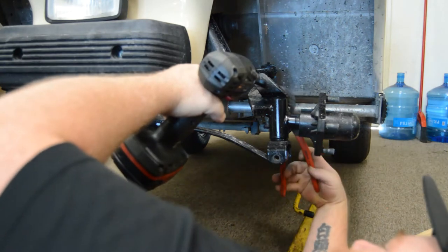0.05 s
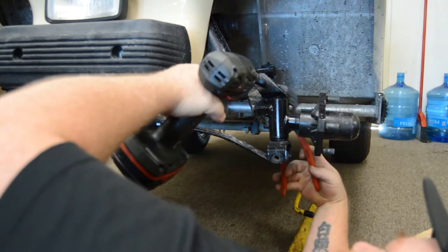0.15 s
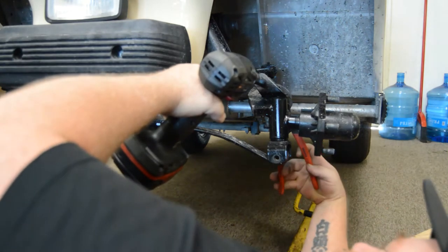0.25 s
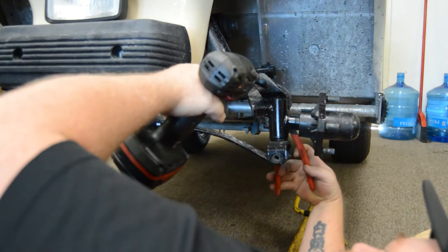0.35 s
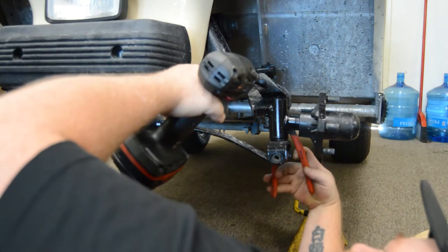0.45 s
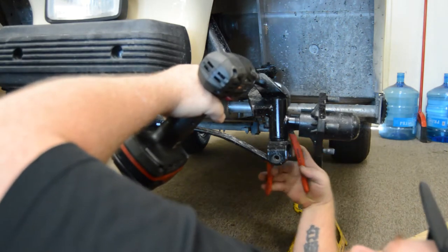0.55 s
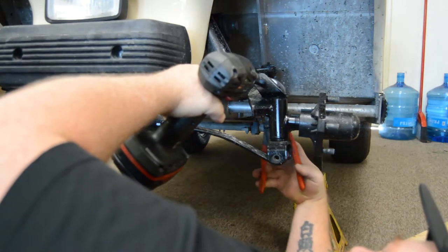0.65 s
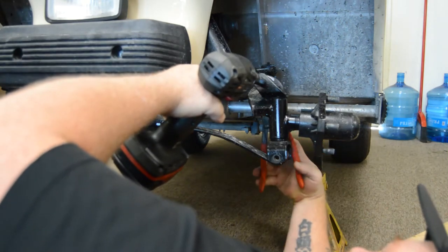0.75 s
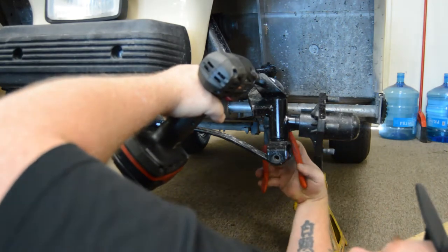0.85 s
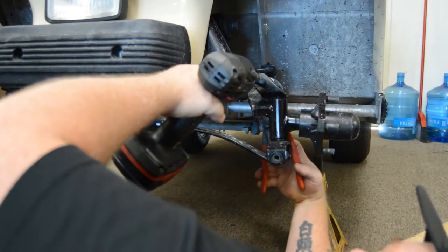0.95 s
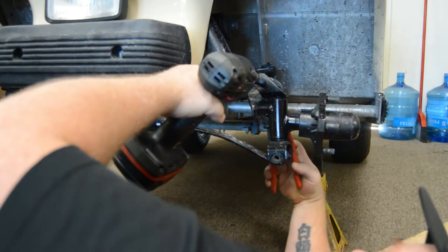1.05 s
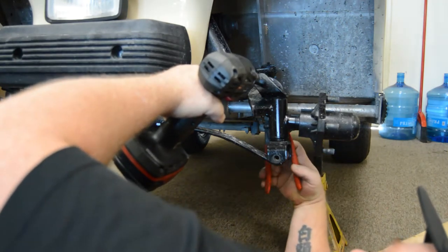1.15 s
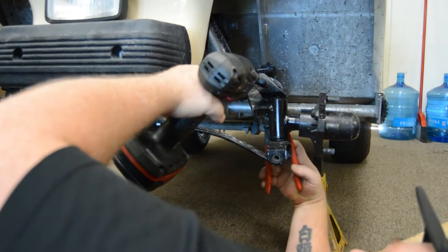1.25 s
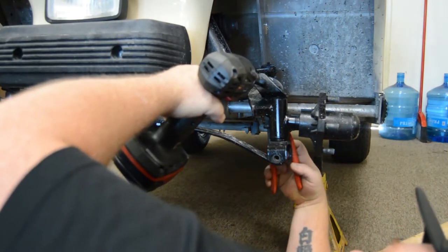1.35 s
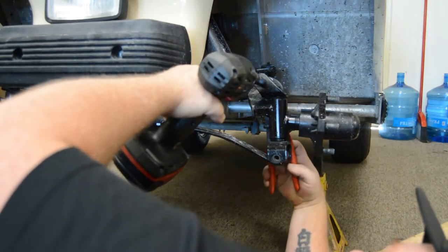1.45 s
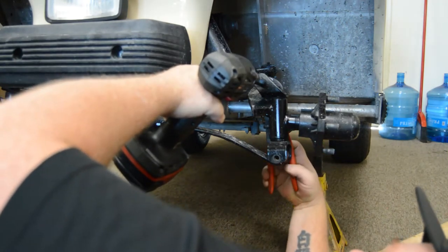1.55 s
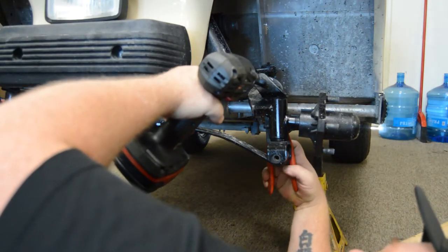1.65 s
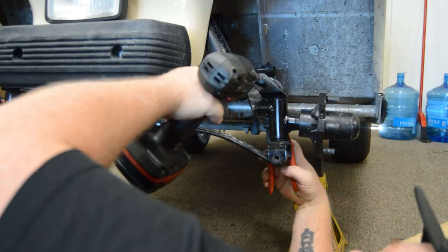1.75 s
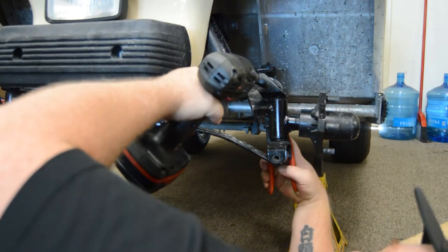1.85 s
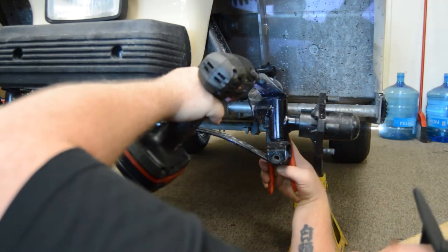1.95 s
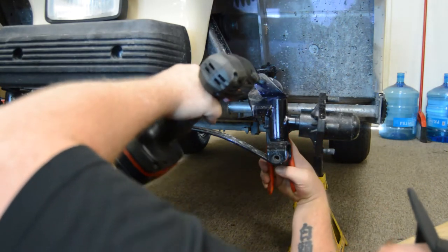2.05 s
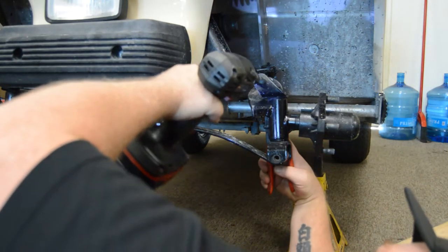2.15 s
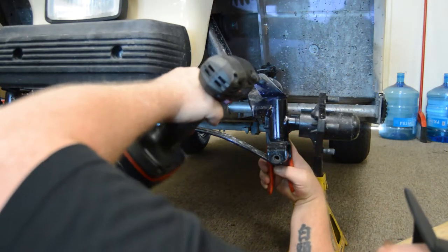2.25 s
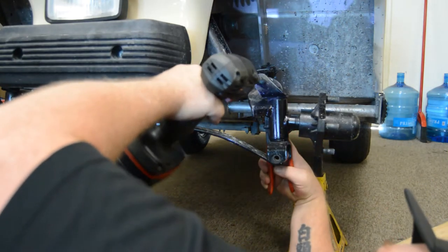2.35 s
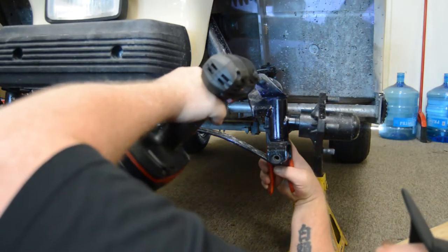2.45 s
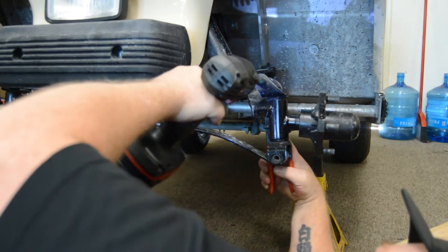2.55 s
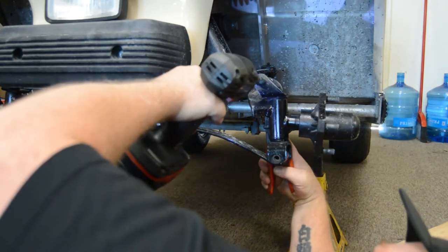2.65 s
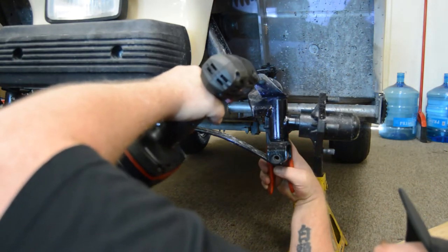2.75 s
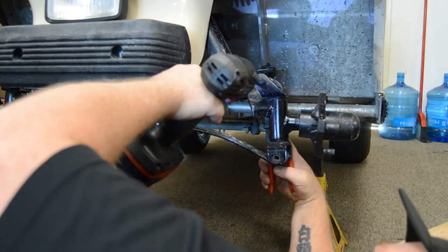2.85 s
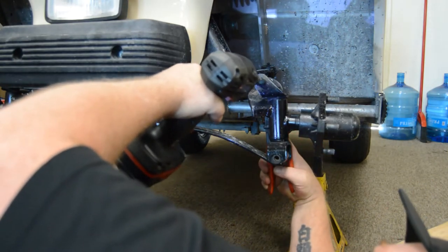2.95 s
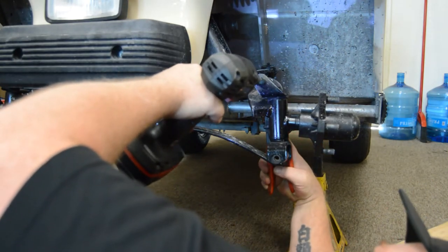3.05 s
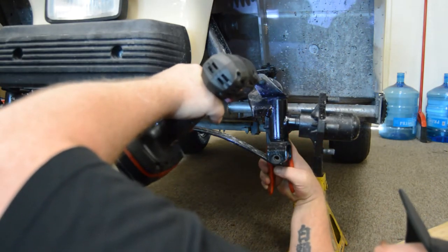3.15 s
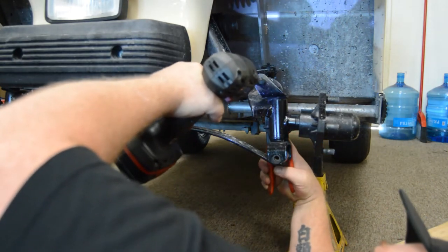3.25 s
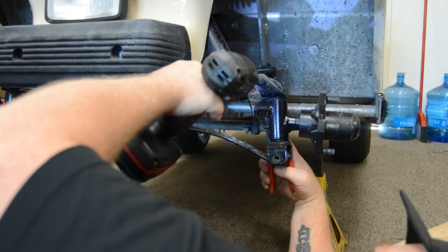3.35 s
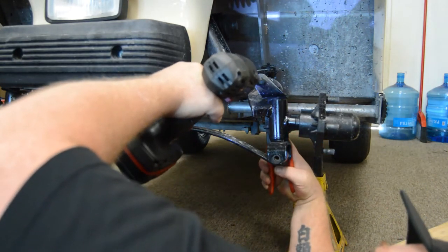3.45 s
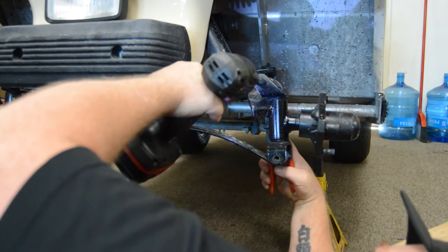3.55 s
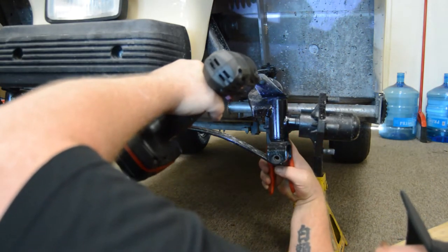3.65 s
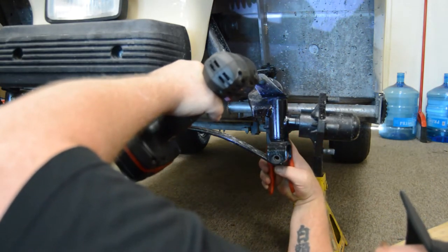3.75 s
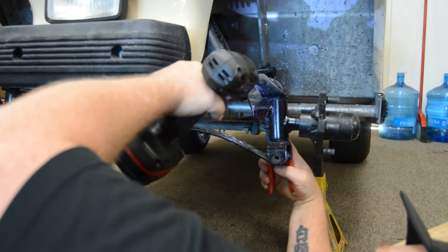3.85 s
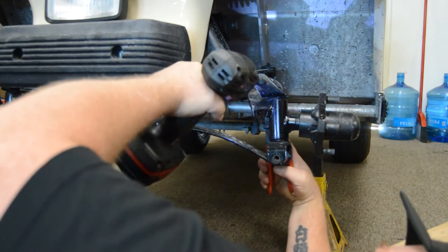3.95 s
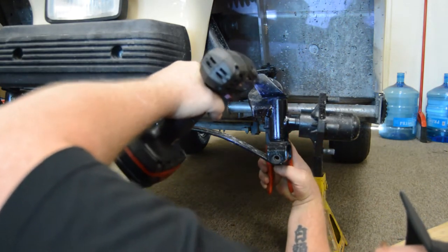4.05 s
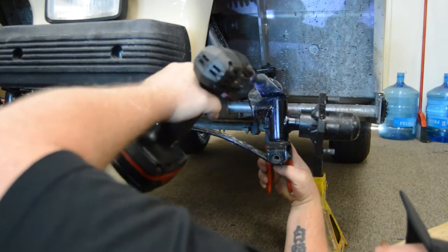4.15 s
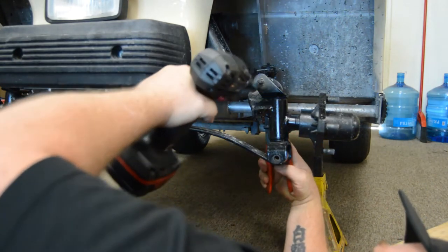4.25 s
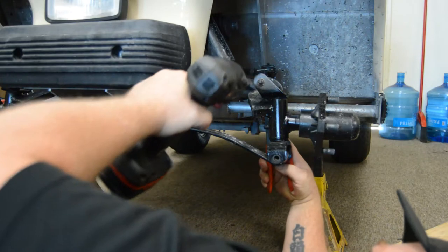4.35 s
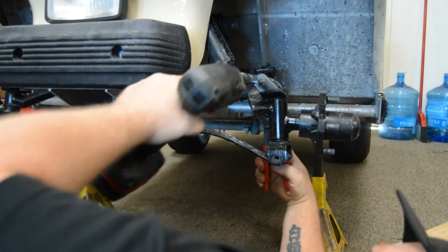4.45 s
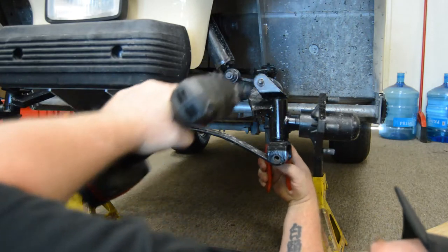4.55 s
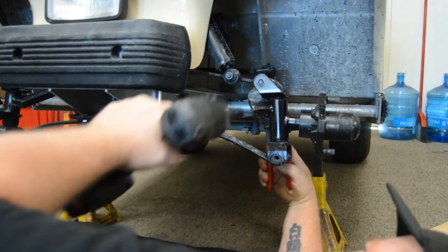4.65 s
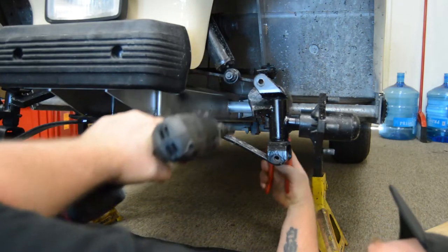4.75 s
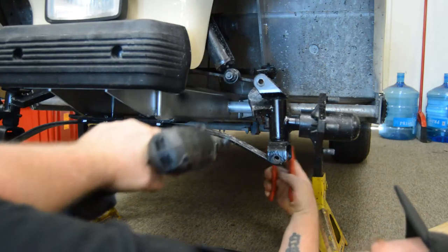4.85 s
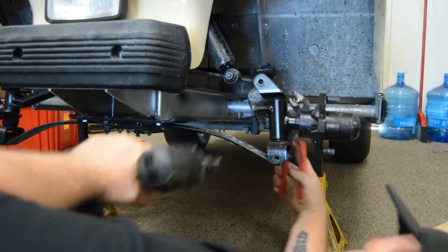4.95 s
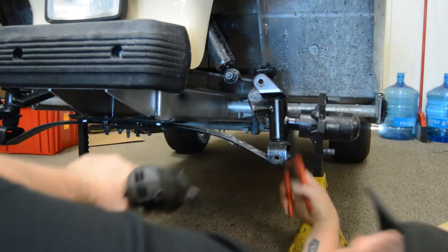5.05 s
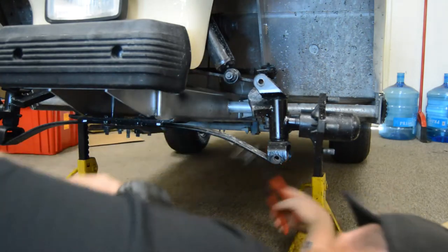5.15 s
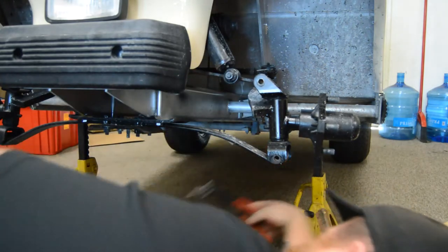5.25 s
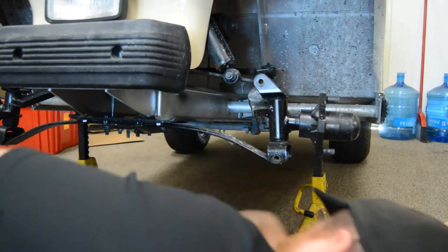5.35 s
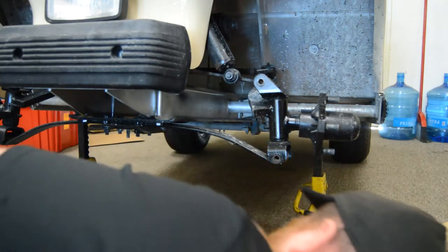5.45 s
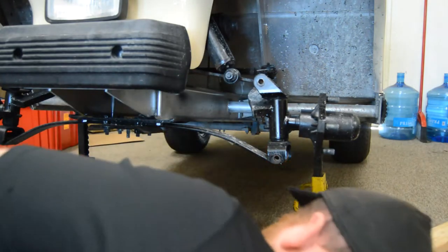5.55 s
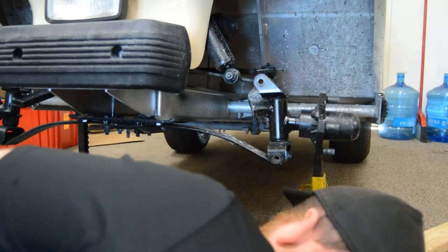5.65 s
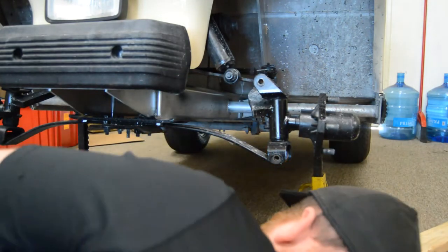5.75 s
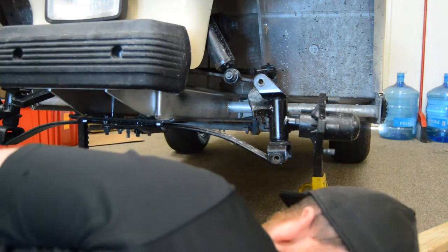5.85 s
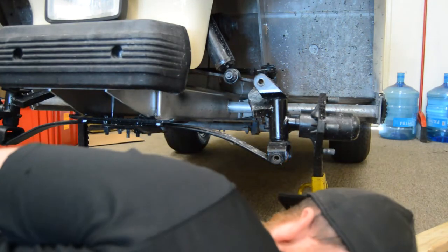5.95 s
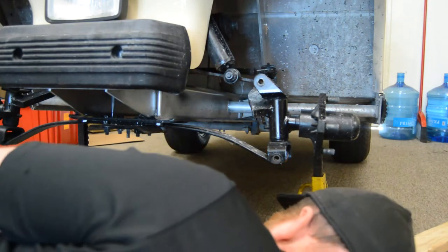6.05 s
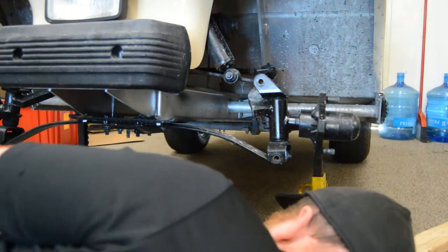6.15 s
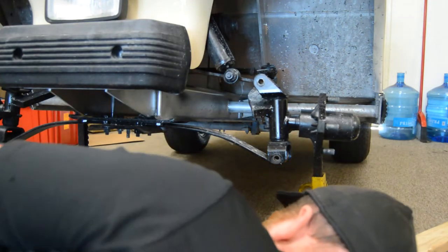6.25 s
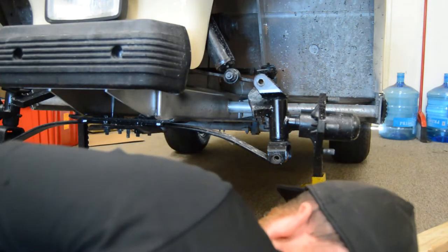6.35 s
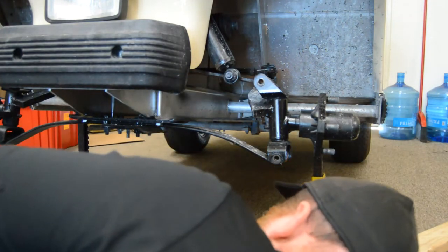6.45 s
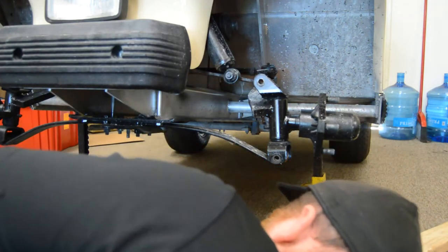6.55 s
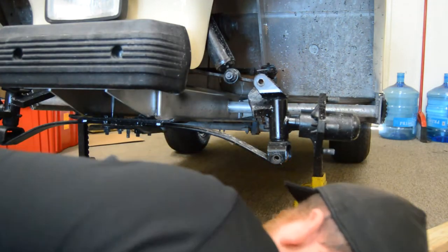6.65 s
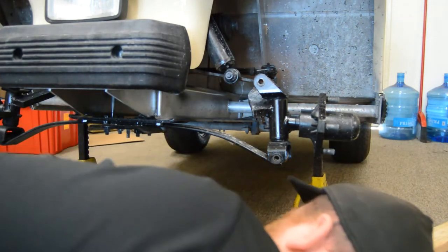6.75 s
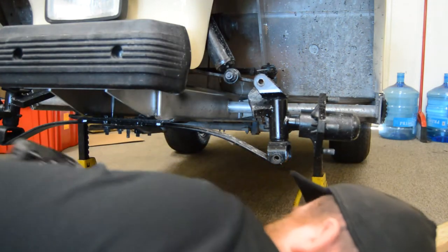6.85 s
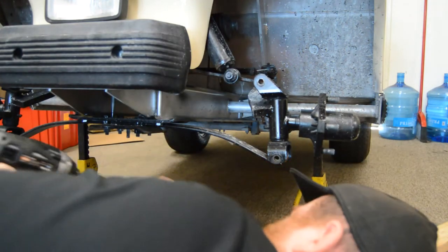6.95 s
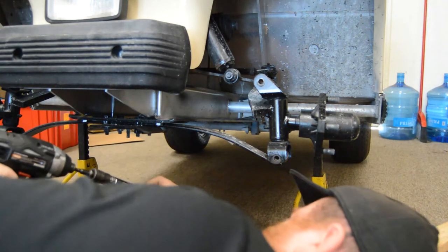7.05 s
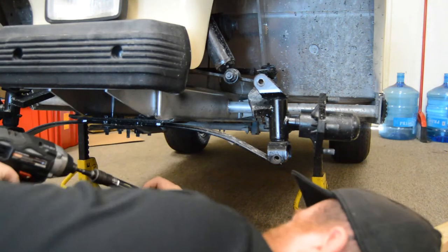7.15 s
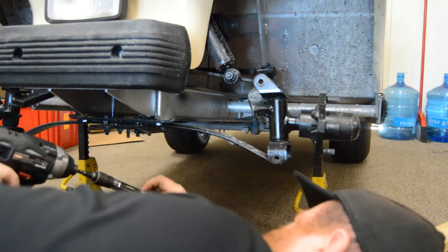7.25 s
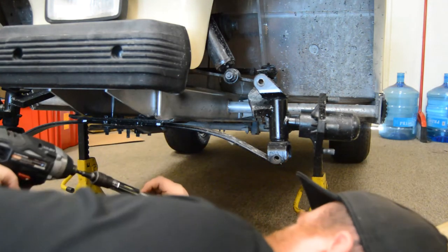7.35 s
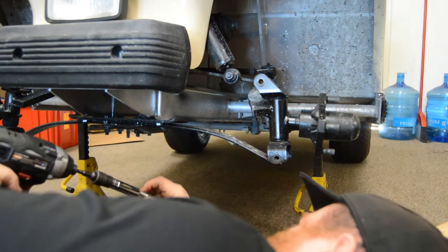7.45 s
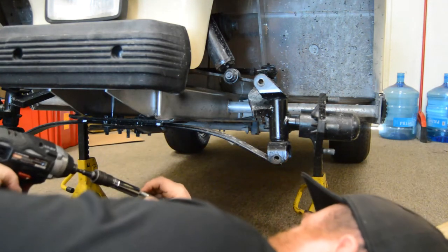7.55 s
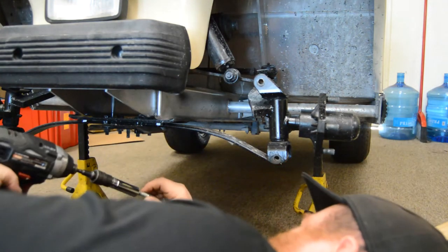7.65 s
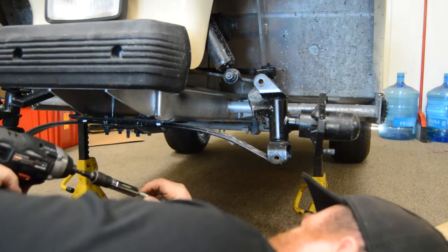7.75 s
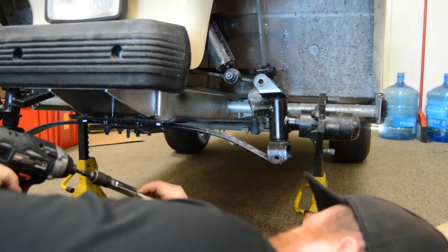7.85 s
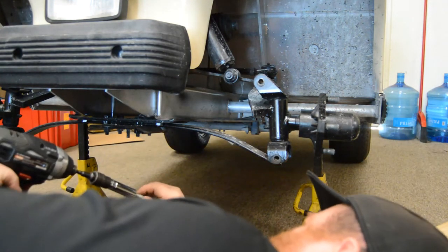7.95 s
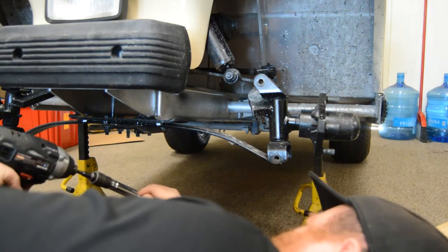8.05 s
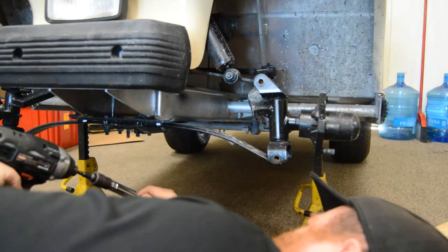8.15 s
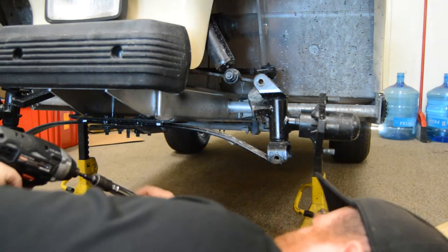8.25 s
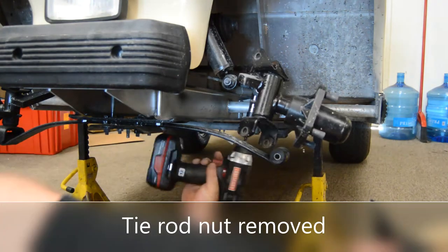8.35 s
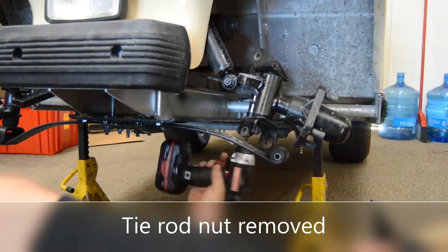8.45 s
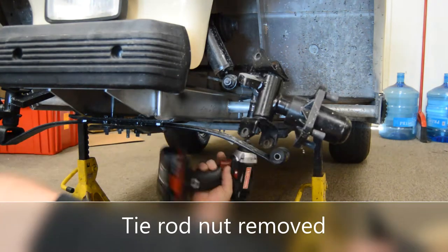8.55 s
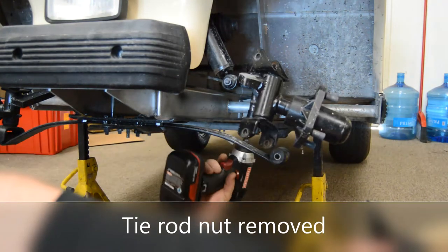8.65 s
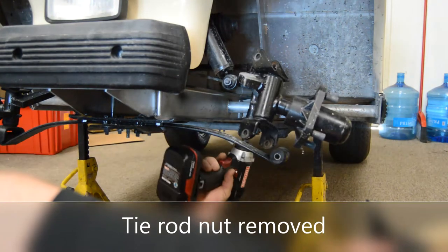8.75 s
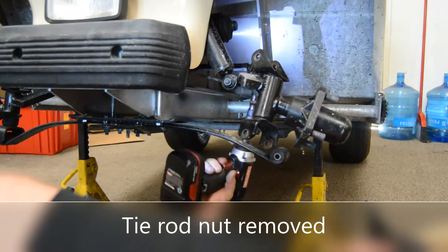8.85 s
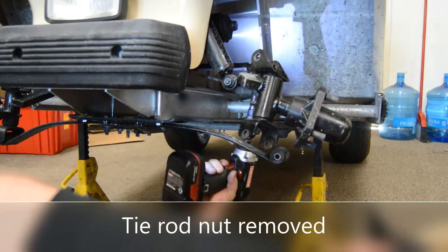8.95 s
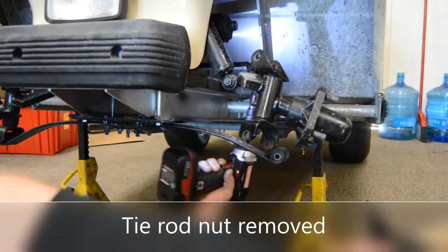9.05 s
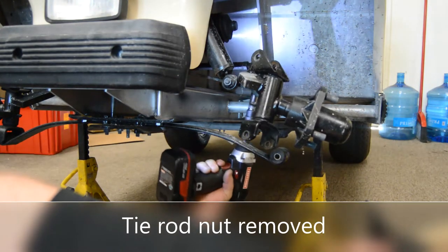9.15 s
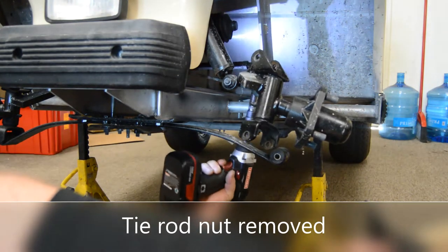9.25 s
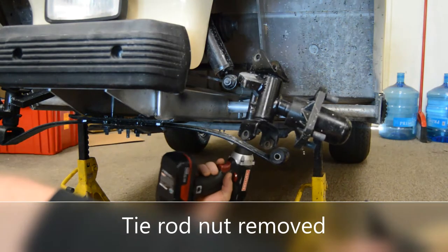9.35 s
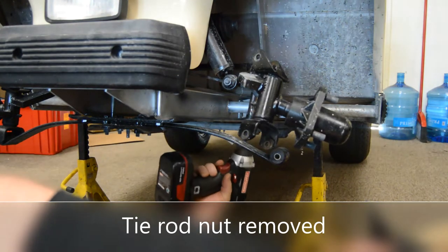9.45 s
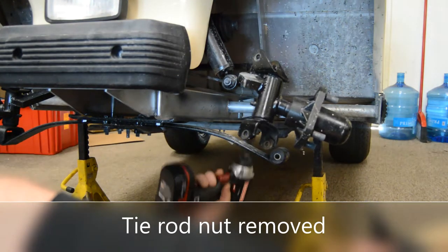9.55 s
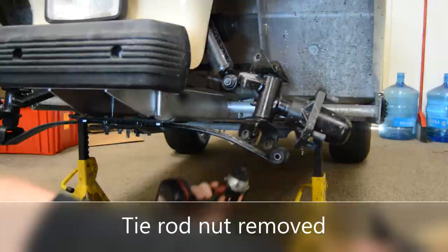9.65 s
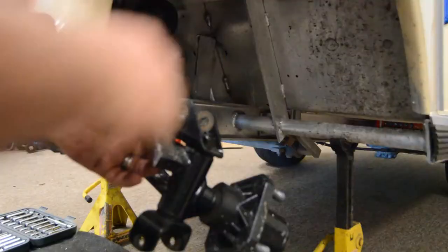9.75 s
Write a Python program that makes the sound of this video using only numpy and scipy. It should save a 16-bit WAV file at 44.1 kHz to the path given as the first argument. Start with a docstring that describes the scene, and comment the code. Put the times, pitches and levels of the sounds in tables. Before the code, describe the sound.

Soft low room air sits under light metal knocks. About two seconds in, a nearby power wrench bursts into dense metallic hammering, distorting the microphone, then whirs loose and cuts off. A short scrape with a clack, small clinks and a clattering steel tool follow in slightly roomier space. After faint rubbing and plastic ticks, another tool fires a half-second buzzing burst and stops.

```python
"""Impact wrench on a steel axle

In a workshop, pliers knock onto a nut and a cordless wrench hammers it about fifty times a second: noise
cracks over ringing modes. Gear noise and a whine follow as the bolt spins free; scrapes draw it out.
Steel is put down with a clink and a jangle of modes, and a second driver gives a short burst.
The power tools stand drier, as if nearer, than the small parts; the blows overload the microphone."""
import sys
import numpy as np
from scipy import signal
from scipy.fft import rfft, irfft
from scipy.io import wavfile

SR = 44100
rng = np.random.default_rng(int(sys.argv[2]) if len(sys.argv) > 2 else 0)


def wrap_up_sound(samples):
    """Save the sound to the file named by the first command line argument, as 16-bit audio."""
    columns = np.atleast_2d(samples).T
    # keep every value between -1 and 1, then stretch to whole-number steps
    tamed = np.clip(columns, -1, 1)
    steps = np.round(tamed * 32767).astype(np.int16)
    wavfile.write(sys.argv[1], SR, steps)


N = 431738
TIME = np.arange(N) / SR

# Table levels are relative; most sources set a further gain on top.

# hammer speed from first blow to last; the wrench slows as the nut gives: (time [s], rate [blows/s])
WRENCH_RATE = [(1.941, 52.7), (2.45, 52.42), (2.56, 55.21), (2.66, 50.73), (3.2, 50.88), (3.45, 49.55),
               (3.6, 45.85), (3.73, 35.42)]
DRIVER_RATE = [(8.8665, 43), (8.91, 52.5), (8.97, 54)]
# blows are hardest while the nut is tight:
# (nut gives [s], easing length [s], tight level [dB], eased level [dB])
WRENCH_FORCE = (2.15, .28, 5, .3)
DRIVER_FORCE = (8.885, .06, 3.5, 0)
# colour of hammer on anvil: (frequency [Hz], density [dB per Hz])
CRACK_COLOUR = [(60, -32), (100, -27.5), (270, -24.5), (420, -11), (520, -6.5), (710, -11), (950, -6),
                (1400, -8.5), (1700, -1.5), (2400, -4), (7200, -6), (9300, 1.5), (11700, -3), (12800, -14),
                (15500, -18)]
# socket and anvil, quickly damped by the nut: (frequency [Hz], level [dB], t60 [s])
SOCKET_MODES = [(1660, -21, 0.024), (1950, -20, 0.018), (3757, -24.5, 0.021), (5340, -17, 0.023),
                (5740, -17, 0.017), (6300, -18, 0.016), (8520, -12.5, .016), (9124, -10.5, 0.012),
                (9540, -9, .015), (10200, -12, 0.017), (10740, -16, 0.015), (11400, -14, .018)]
# axle and steering arm: (frequency [Hz], level [dB], t60 [s])
AXLE_MODES = [(362, -19, .1), (422.7, -11.5, 0.13), (525, -7.5, 0.14), (565.5, -21, 0.066),
              (722, -11, 0.18), (935, -0.5, 0.14), (1060, -9, 0.12), (1266, -6.5, .06), (1650, -7, 0.06),
              (1945, -9, .07)]
# socket and drive clack as they catch and let go: (time [s], level [dB])
CLACKS = [(1.889, -32), (1.9325, 10), (4.012, -4), (4.1025, -1.5), (4.1725, -5), (4.2106, -15),
          (4.6676, -1.5), (4.6768, -2), (8.8824, -3), (9.2428, -3), (9.2687, -5), (9.399, -30),
          (9.439, -28), (9.4768, -35)]
AXLE_FOLLOWS_FORCE = 1.5  # a tight nut passes more into the axle: dB for each dB of the blows


def hammer(rebound_s=.0036, rebound_db=-7, axle_lag_s=.0025, alike_hz=2500):
    """Each blow cracks, rebounds on the nut and rings socket and axle; only its low part repeats."""
    wrench_s, driver_s = blow_times(WRENCH_RATE), blow_times(DRIVER_RATE)
    s = np.concatenate([wrench_s, driver_s])
    s = s + .00006 * rng.standard_normal(len(s))
    db = np.concatenate([force_db(wrench_s, WRENCH_FORCE), force_db(driver_s, DRIVER_FORCE)])
    db = db + .8 * rng.standard_normal(len(s))
    blows = np.column_stack([s, db])
    rebound_times = s + rebound_s * rng.uniform(.85, 1.15, len(s))
    rebounds = np.column_stack([rebound_times, db + rebound_db])

    # one noise burst shared by every blow gives the low part
    t = TIME[:SR // 10]
    burst = rng.standard_normal(len(t)) * from_db(-60 * t / .039)
    low_pass = signal.butter(2, alike_hz, "low", fs=SR, output="sos")
    high_pass = signal.butter(2, alike_hz, "high", fs=SR, output="sos")
    repeated = signal.oaconvolve(clicks(blows), burst)[:N]
    alike = from_db(-7) * signal.sosfilt(low_pass, repeated)
    # fresh noise gives the treble of each blow and the whole of each rebound
    unlike = from_db(-0.5) * signal.sosfilt(high_pass, crack(blows, t60=.013))
    unlike += crack(rebounds, t60=.011)

    socket = ring(np.vstack([blows, rebounds]), SOCKET_MODES, spread_db=4)
    axle_hits = np.column_stack([s + axle_lag_s, AXLE_FOLLOWS_FORCE * db])
    axle = ring(axle_hits, AXLE_MODES, spread_db=2)
    clacks = from_db(-3.5) * crack(CLACKS, t60=.021)
    cracks = colour(alike + unlike + clacks, CRACK_COLOUR)
    return cracks + from_db(-1) * socket + from_db(-30.3) * axle


def blow_times(rate):
    """The moments at which the hammer meets the anvil: each whole turn of the summed rate."""
    s, per_s = np.transpose(rate)
    t = TIME[(TIME >= s[0]) & (TIME <= s[-1])]
    struck = np.cumsum(np.interp(t, s, per_s)) / SR
    return np.interp(np.arange(struck[-1]), struck, t)


def force_db(t, force):
    """Strength of the blows, easing off as the nut gives."""
    gives_s, easing_s, tight_db, eased_db = force
    return tight_db + (eased_db - tight_db) * ramp(t, gives_s, easing_s)


# one pull of each trigger: (pressed [s], socket catches [s], released [s],
# gear noise under the hammer [dB], running free [dB], rise as the loose nut rattles [dB])
WRENCH_PULL = (1.87, 1.922, 4.17, -22.7, -28.7, 9.6)
DRIVER_PULL = (8.8, 8.865, 9.272, -20.5, -20.5, 4.5)
# housing colours: (frequency [Hz], density [dB per Hz])
WRENCH_BODY = [(88, -52.5), (150, -29.5), (253, -17.5), (509, -0.5), (766, -8), (1040, -4), (1200, -6.5),
               (1600, -6), (1870, -4), (2650, -2.5), (3480, -5.5), (4840, -4), (6860, -4.5), (9540, 2),
               (15500, -13.5)]
DRIVER_BODY = [(88, -48), (150, -27.5), (471, -16), (561, -0.5), (812, -13.5), (948, -10.5), (1170, -9),
               (1480, -13), (2270, -10.5), (2760, -13), (3980, -16.5), (10100, -7), (15500, -33)]
# housing resonances: (frequency [Hz], width [Hz], level [dB])
WRENCH_PEAKS = [(544, 250, -17.5), (1080, 68, -13.5), (1630, 67, -13.5), (2700, 430, -24), (5450, 300, -22),
                (9400, 320, -19.5)]
DRIVER_PEAKS = [(552, 36, -11.5), (956, 65, -30), (1466, 36, -20), (2730, 200, -7)]
# swells of the gear whine at speed: (strongest at [s], rise [s], fall [s], level [dB])
WRENCH_WHINE = [(4.015, .28, .2, -24.5)]
DRIVER_WHINE = [(8.88, .04, .08, -26), (9.18, .19, .19, -22.7)]
# pitch of the gear mesh wherever the whine is heard, before flutter: (time [s], frequency [Hz])
WRENCH_MESH = [(3.72, 1380), (3.84, 1440), (3.9, 1545), (4.035, 1602), (4.06, 1410), (4.18, 1200),
               (4.26, 800)]
DRIVER_MESH = [(8.82, 524), (8.88, 570), (9.06, 598), (9.14, 602), (9.2, 580), (9.4, 545)]
# lines of the whine: (multiple of the mesh pitch, level [dB])
WRENCH_ORDERS = [(.67, -15.5), (1, -4), (2, -7.5), (3, -3.5), (3.501, -14.5), (4, -8), (4.999, -0.5),
                 (6, -5), (7, -9.5)]
DRIVER_ORDERS = [(1, -2.5), (1.66, -12), (2.6, -10), (4.78, -7), (15.5, -6)]


def motors():
    """The wrench and the driver each run once: gear noise and whine, fading after release."""
    drive = drive_gain(WRENCH_PULL, WRENCH_RATE, WRENCH_FORCE)
    wrench = from_db(-1) * gears(drive, WRENCH_BODY, WRENCH_PEAKS, rattle_db=3, peaks_db=-0.5)
    wrench += whine(WRENCH_WHINE, WRENCH_MESH, WRENCH_ORDERS, WRENCH_PEAKS, flutter=.0033, lift_db=7)
    drive = drive_gain(DRIVER_PULL, DRIVER_RATE, DRIVER_FORCE)
    driver = from_db(-1) * gears(drive, DRIVER_BODY, DRIVER_PEAKS, rattle_db=3, peaks_db=-4)
    driver += whine(DRIVER_WHINE, DRIVER_MESH, DRIVER_ORDERS, DRIVER_PEAKS, flutter=.01, lift_db=1.5)
    return run_down(wrench, WRENCH_PULL) + run_down(driver, DRIVER_PULL)


SPIN_UP_DB_PER_S, SPUN_UP_DB = 420, -29  # the unloaded motor grows louder until the socket catches
SURGE_DB, SURGE_S = 5, .07  # the gears jolt as they take the load
GEARS_FOLLOW_FORCE = .9  # dB of gear noise for each dB of the blows
LOOSE_AFTER_S, LOOSENING_S = .11, .17  # after the last blow: smooth running, then a growing rattle


def drive_gain(pull, rate, force):
    """The motor spins up, jolts and labours under the hammer, then runs free and grows louder."""
    pressed_s, catches_s, _, loaded_db, free_db, loose_db = pull
    last_blow_s = rate[-1][0]
    starting = SPUN_UP_DB - SPIN_UP_DB_PER_S * (catches_s - TIME)
    surge = SURGE_DB * np.exp(-np.abs(TIME - catches_s) / SURGE_S)
    loaded = loaded_db + surge + GEARS_FOLLOW_FORCE * force_db(TIME, force)
    free = free_db + loose_db * ramp(TIME, last_blow_s + LOOSE_AFTER_S, LOOSENING_S)
    level_db = np.select([TIME < catches_s, TIME < last_blow_s], [starting, loaded], free)
    return (TIME > pressed_s) * from_db(level_db)


def gears(drive, body, peaks, rattle_db, peaks_db):
    """Teeth or sliding steel grind unevenly inside a body, which adds its resonances."""
    grind = rng.standard_normal(N) * from_db(rattle_db * drift(700))
    grind /= grind.std()
    resonances = sum(from_db(db + peaks_db) * resonate(grind, hz, width) for hz, width, db in peaks)
    return drive * (colour(grind, body) + resonances)


def whine(swells, mesh, orders, peaks, flutter, lift_db):
    """The gear mesh sings at a moving pitch; lines swell as they cross a housing resonance."""
    pitch = np.interp(TIME, *np.transpose(mesh))
    phase = 2 * np.pi * np.cumsum(pitch * (1 + flutter * drift(500))) / SR
    lines = strokes(swells) * sum(from_db(db) * np.sin(k * phase) for k, db in orders)
    lifted = np.zeros(N)
    for hz, width_hz, _ in peaks:
        b, a = signal.iirpeak(hz, hz / width_hz, fs=SR)
        lifted += signal.lfilter(b, a, lines)
    return lines + from_db(lift_db) * lifted


def run_down(x, pull, fade_db_per_s=290, extra_treble_db_per_s=170, treble_hz=5500):
    """Once the trigger is released the motor fades, its treble faster still."""
    coasting_s = np.maximum(TIME - pull[2], 0)
    low, high = split(x, treble_hz)
    dulled = low + high * from_db(-extra_treble_db_per_s * coasting_s)
    return from_db(-fade_db_per_s * coasting_s) * dulled


# pliers knock on the nut: (time [s], bright click level [dB], axle thud level [dB])
KNOCKS = [(0.1624, -5, -20), (.525, -40, -25), (.642, -17, -30), (0.6472, -7, -18.5), (.719, -25, -44),
          (0.7605, -17, -22), (0.903, -46, -23.5), (.961, -14, -18), (1.243, -32, -34), (1.276, -52, -23.5)]
# pliers' own ring: (frequency [Hz], level [dB], t60 [s])
PLIERS_MODES = [(7990, -6, 0.03), (8550, -26, 0.4), (8700, -13, 0.11), (9400, -15, .15)]
# colours of the click and of the thud: (frequency [Hz], density [dB per Hz])
KNOCK_CLICK = [(300, -9.5), (1000, -12.5), (1900, -4), (3200, -21.5), (5200, -12.5), (7000, -15), (8200, 6),
               (9600, 2), (11500, -12), (15500, -36)]
KNOCK_THUD = [(150, -23), (340, 1), (520, 7), (750, -5.5), (1100, 0), (1450, -13), (2000, -20), (3000, -28),
              (5000, -26)]


def knocks():
    """The pliers click against the nut and the axle thuds behind it: noise bursts with modes."""
    s, click_db, thud_db = np.transpose(KNOCKS)
    bright, dull = np.column_stack([s, click_db]), np.column_stack([s, thud_db])
    jaws = ring(bright, PLIERS_MODES, spread_db=2)
    axle = ring(dull, AXLE_MODES, spread_db=2.5)
    click = from_db(-5.5) * colour(crack(bright, t60=.038), KNOCK_CLICK) + from_db(-14) * jaws
    thud = from_db(-14.5) * axle + from_db(-8) * colour(crack(dull, t60=.12), KNOCK_THUD)
    return click + thud


# pliers are seated and the bolt drawn out: (strongest at [s], rise [s], fall [s], level [dB])
SCRAPES = [(.65, .3, .15, -44), (.96, .5, .3, -48), (4.55, .025, .1, -43), (4.62, .05, .07, -25),
           (4.67, .08, .055, -21.5)]
# colour of steel on steel: (frequency [Hz], density [dB per Hz])
SCRAPE_BODY = [(100, -40), (250, -23), (400, -9), (560, -22), (680, -6), (1080, -7), (1500, -16),
               (2100, -16.5), (4600, -18), (7500, -19.5), (9000, -7), (11500, -21), (15500, -38)]
# resonances of the scraped steel: (frequency [Hz], width [Hz], level [dB])
SCRAPE_PEAKS = [(412, 70, -16), (1037, 56, -9.5), (8800, 310, -21)]


def scraping():
    """Uneven slips excite the axle and the sliding steel."""
    return from_db(-3) * gears(strokes(SCRAPES), SCRAPE_BODY, SCRAPE_PEAKS, rattle_db=2, peaks_db=1.5)


# a small steel piece clinks as it is put down and, in the last two rows, faintly in the hand:
# (time [s], touch level [dB], ring level [dB])
CLINKS = [(5.577, -38, -55), (5.641, -18, -19), (5.665, -28, -38), (5.727, -27, -36), (5.765, -37, -50),
          (5.832, -42, -56), (7.188, -44, -46), (7.755, -42, -48)]
# modes of the small piece and of the dropped tool: (frequency [Hz], level [dB], t60 [s])
SMALL_STEEL_MODES = [(2580, -8, 0.06), (4950, -2, .055), (5200, -17, 0.093), (6262, -8, 0.56),
                     (8200, -16, .07), (9900, -3, 0.1), (11000, -9, .06)]
TOOL_MODES = [(1634, -9.5, 0.31), (2420, -16, .34), (2930, -16, 0.35), (3950, -19, 0.35), (4200, -13, .33),
              (4700, -8, 0.31), (5155, -9, 0.36), (5630, -12, 0.28), (5766, -14, 0.29), (6918, -19, .18),
              (7327, -8, .25), (7970, -14, 0.201), (8500, -5, 0.17), (8150, 0, 0.24), (8560, -7, 0.14),
              (9500, -8, 0.12), (9800, 0, 0.13), (10060, 5, 0.18), (10140, -2, 0.22), (10500, -19, 0.091)]
# a steel tool drops and bounces, one end first:
# (time [s], other end after [s], first end level [dB], other end level [dB])
BOUNCES = [(6.038, .006, -7, -6), (6.165, .012, -13, -10), (6.248, .012, -16, -17)]
# its grip meets the floor just before the steel: (time [s], level [dB])
GRIP_KNOCK = [(6.0325, -22.5)]
# colours of touching steel, first landing and grip: (frequency [Hz], density [dB per Hz])
TOUCH_COLOUR = [(120, -54), (200, -29), (1190, -29), (1590, -18), (3070, -22), (4410, -18), (5110, -7),
                (6710, -16), (7220, -4.5), (10200, -2.5), (15500, -40)]
LANDING_COLOUR = [(200, -11.5), (700, -19), (1350, -7), (2400, -32), (5000, -5), (10000, 5), (13000, -8),
                  (15500, -12)]
GRIP_COLOUR = [(200, -12), (700, -14), (1350, 1), (2200, -17), (9000, -14), (15500, -30)]


def loose_steel():
    """Steel pieces touch and chatter: a short crash, then their own modes."""
    clinks = np.array(CLINKS)
    small_ring = ring(clinks[:, [0, 2]], SMALL_STEEL_MODES, spread_db=1.5)
    small_touches = chatter(clinks[:, :2], length_s=.014, first_db=-4.5, fade_db=-2)
    small_crash = colour(crack(small_touches, t60=.049), TOUCH_COLOUR)
    small = from_db(-1) * small_ring + from_db(-10.5) * small_crash

    ends = []
    for s, after_s, first_db, other_db in BOUNCES:
        ends += [(s, first_db), (s + after_s, other_db)]
    touches = chatter(ends, length_s=.065, first_db=-7, fade_db=-9)
    tool_ring = ring(touches, TOOL_MODES, spread_db=2.5)
    tool_crash = colour(crack(touches, t60=.038), TOUCH_COLOUR)
    tool = from_db(-20) * tool_ring + from_db(-5.5) * tool_crash
    # the first blow on the floor, on both ends
    landing = from_db(-1) * colour(crack(ends[:2], t60=.038), LANDING_COLOUR)
    grip = colour(crack(GRIP_KNOCK, t60=.06), GRIP_COLOUR)
    return small + tool + grip + landing


def chatter(hits, length_s, first_db, fade_db, count=6):
    """Every touch is followed by a few weaker ones at uneven moments."""
    hits = np.array(hits)
    late = (np.arange(count) + rng.random((len(hits), count))) / count  # 0 to 1 over the chatter
    after_s = hits[:, :1] + length_s * late
    after_db = hits[:, 1:] + first_db + fade_db * late
    return np.vstack([hits, np.column_stack([after_s.ravel(), after_db.ravel()])])


# plastic ticks of the handled tools: (time [s], body level [dB], bright edge level [dB])
TICKS = [(5.0125, -17.5, -29), (5.9795, -31, -38), (6.8695, -23, -26), (7.1877, -17.5, -15.5),
         (7.442, -42, -35), (7.7223, -37, -35), (8.4235, -28, -24), (8.491, -28, -22), (8.5884, -26, -25),
         (9.772, -29, -25)]
# hands and sleeves rub on the tools: (strongest at [s], rise [s], fall [s], level [dB])
RUBS = [(.03, .1, .8, -51.5), (1, .3, .3, -56), (4.8, .6, .55, -50), (5.85, .6, .4, -52),
        (6.42, .5, .9, -48), (8.42, .05, .6, -44.5), (9.45, .2, .2, -46)]
# colours of ticks and rubbing: (frequency [Hz], density [dB per Hz])
TICK_COLOUR = [(400, -7), (1200, -7), (2400, 2), (4200, -5), (6000, -9), (9500, -4), (12000, -16),
               (15500, -31)]
RUB_COLOUR = [(500, 4.5), (1500, -0.5), (4000, -4), (7000, -4.5), (10000, 3), (12500, -10), (15500, -15)]


def handling(edge_hz=6500):
    """Dry ticks, some duller than others, and faint rubbing, all from shaped noise."""
    ticks = np.array(TICKS)
    body, _ = split(crack(ticks[:, [0, 1]], t60=.03), edge_hz)
    _, edge = split(crack(ticks[:, [0, 2]], t60=.027), edge_hz)
    rub = colour(rng.standard_normal(N) * from_db(1.3 * drift(60)), RUB_COLOUR)
    return from_db(-6.5) * colour(body + edge, TICK_COLOUR) + strokes(RUBS) * rub


# decay of the room: (frequency [Hz], t60 [s])
ROOM_T60 = [(200, 0.36), (1000, 0.28), (4000, .3), (12000, 0.14)]


def workshop(x, wet_db, first_echo_s=.0055, count=7):
    """Adds a diffuse room tail of noise bands, the treble dying soonest."""
    t, tail = TIME[:SR // 2], 0
    edges = np.geomspace(100, 18000, count + 1)
    for low, high in zip(edges, edges[1:]):
        band_pass = signal.butter(2, [low, high], "band", fs=SR, output="sos")
        band = signal.sosfilt(band_pass, rng.standard_normal(len(t)))
        tail = tail + band * from_db(-60 * t / at_hz(ROOM_T60, np.sqrt(low * high)))
    tail = tail * (t > first_echo_s)
    return x + from_db(wet_db) * signal.oaconvolve(x, tail / np.linalg.norm(tail))[:N]


# colour of the room air: (frequency [Hz], density [dB per Hz])
AIR_COLOUR = [(25, -14), (55, 0), (80, -3.5), (120, -2), (170, -7), (205, -12.5), (250, -10), (400, -11.5),
              (1500, -22), (2600, -25), (6000, -32), (10000, -33), (15500, -39)]
# low room drone: (frequency [Hz], width [Hz], level [dB])
AIR_DRONE = [(58, 6, -16), (142, 14, -11.5)]


def room_air():
    """A soft rush of coloured noise with a low drone of narrow noise bands."""
    rush = colour(rng.standard_normal(N), AIR_COLOUR)
    drone = sum(from_db(db) * resonate(rng.standard_normal(N), hz, width) for hz, width, db in AIR_DRONE)
    return from_db(-46.7) * (rush + drone)


# moments at which the level dips briefly: (time [s])
DIPS = [8.342, 9.738]


def dips(depth_db=-30, half_s=.024):
    """Gain over time: the level dips briefly twice."""
    return from_db(depth_db * sum(np.maximum(1 - np.abs(TIME - s) / half_s, 0) for s in DIPS))


def crack(hits, t60, spread_db=0):
    """Countless short-lived modes: a burst of noise that dies after each hit."""
    keep = from_db(-60 / (t60 * SR))
    envelope = signal.lfilter([1], [1, -keep], clicks(hits, spread_db) + 1e-18)
    return envelope * rng.standard_normal(N)


def ring(hits, modes, spread_db):
    """Each hit strikes every damped mode with a strength of its own."""
    out = np.zeros(N)
    for hz, db, t60 in modes:
        r, w = from_db(-60 / (t60 * SR)), 2 * np.pi * hz / SR
        strikes = clicks(hits, spread_db) + 1e-18
        out += from_db(db) * signal.lfilter([0, np.sin(w)], [1, -2 * r * np.cos(w), r * r], strikes)
    return out


def clicks(hits, spread_db=0):
    """One impulse for each (time [s], level [dB]) row."""
    hits, out = np.array(hits), np.zeros(N)
    level_db = hits[:, 1] + spread_db * rng.standard_normal(len(hits))
    out[np.round(hits[:, 0] * SR).astype(int)] = from_db(level_db)
    return out


def strokes(rows, range_db=20):
    """Gain of sounds that gain range_db over their rise and lose it over their fall."""
    gain = 0
    for s, rise_s, fall_s, db in rows:
        away = np.maximum((s - TIME) / rise_s, (TIME - s) / fall_s)
        gain = gain + from_db(db - range_db * away)
    return gain


def colour(x, spectrum, size=4096):
    """Causal minimum-phase filter with the given spectrum; white noise keeps its power."""
    gain = from_db(at_hz(spectrum, np.arange(size // 2 + 1) * SR / size))
    cepstrum = irfft(np.log(gain))
    # folding the cepstrum forward makes the response causal
    cepstrum[1:size // 2] *= 2
    cepstrum[size // 2 + 1:] = 0
    response = irfft(np.exp(rfft(cepstrum)))
    return signal.oaconvolve(x, response / np.linalg.norm(response))[:N]


def resonate(x, hz, width_hz):
    """One resonance; white noise keeps its power."""
    b, a = signal.iirpeak(hz, hz / width_hz, fs=SR)
    return signal.lfilter(b, a, x) * np.sqrt(SR / (np.pi * width_hz))


def split(x, hz):
    """The parts below and above a frequency."""
    return [signal.sosfilt(signal.butter(3, hz, kind, fs=SR, output="sos"), x) for kind in ("low", "high")]


def drift(per_s):
    """Smooth chance with a spread near 1, through per_s random points a second."""
    knots = rng.standard_normal(N // 8)
    return np.interp(TIME * per_s, np.arange(len(knots)), knots)


def ramp(t, start_s, length_s):
    """Goes from 0 to 1 over the given stretch."""
    return np.clip((t - start_s) / length_s, 0, 1)


def at_hz(points, hz):
    """Read a table on a log-frequency axis."""
    points = np.array(points)
    return np.interp(np.log(np.maximum(hz, 1)), np.log(points[:, 0]), points[:, 1])


def from_db(db):
    """Decibels to gain."""
    return 10 ** (np.asarray(db) / 20)


def scene():
    """Power tools and, with more room around them, small parts, over still air."""
    power_tools = workshop(hammer() + motors(), wet_db=-14)
    small_parts = workshop(knocks() + scraping() + loose_steel() + handling(), wet_db=-10)
    return (dips() * (power_tools + small_parts + room_air()))[None]


def record(dry, ceiling=.92, cutoff_hz=15800):
    """The microphone input clips on the blows; the top of the treble is cut."""
    clipped = np.clip(dry, -ceiling, ceiling)
    return signal.sosfilt(signal.ellip(10, .1, 70, cutoff_hz, fs=SR, output="sos"), clipped)


dry = scene()
out = record(dry)
wrap_up_sound(out)
```